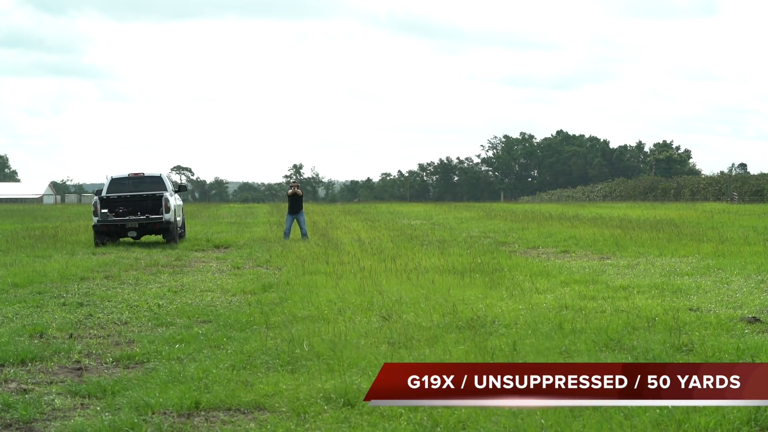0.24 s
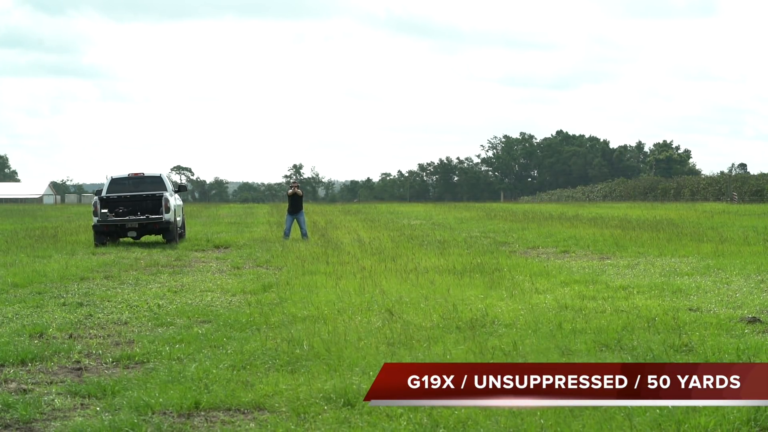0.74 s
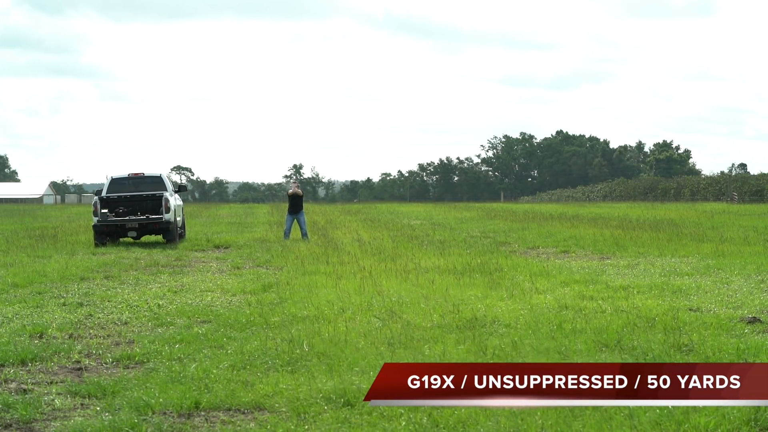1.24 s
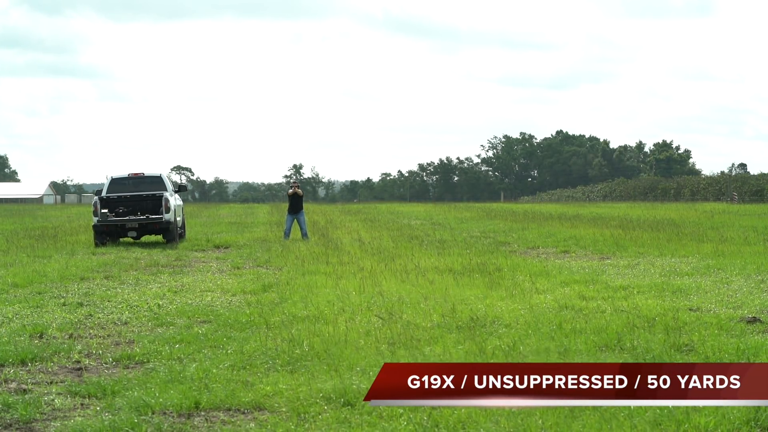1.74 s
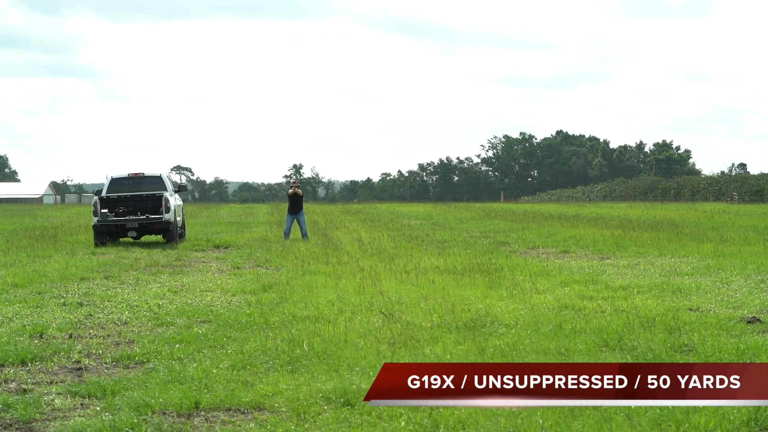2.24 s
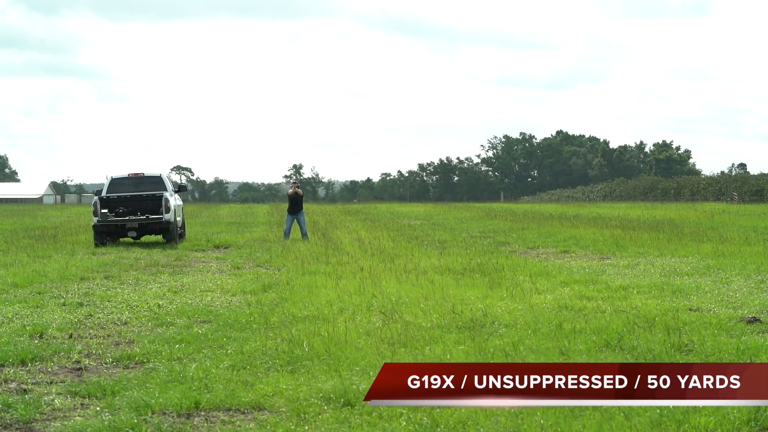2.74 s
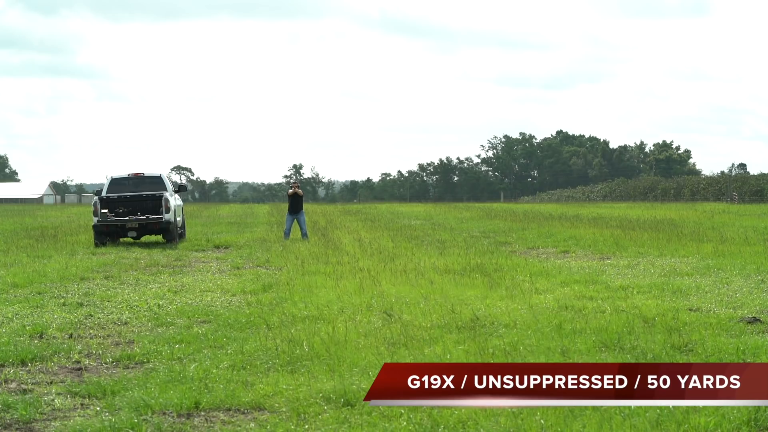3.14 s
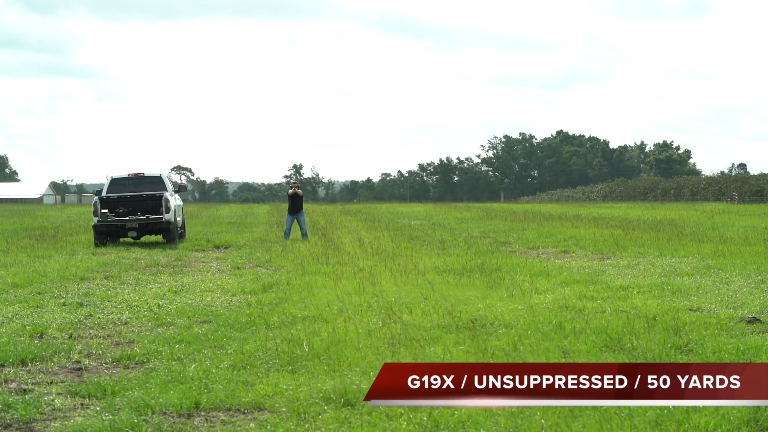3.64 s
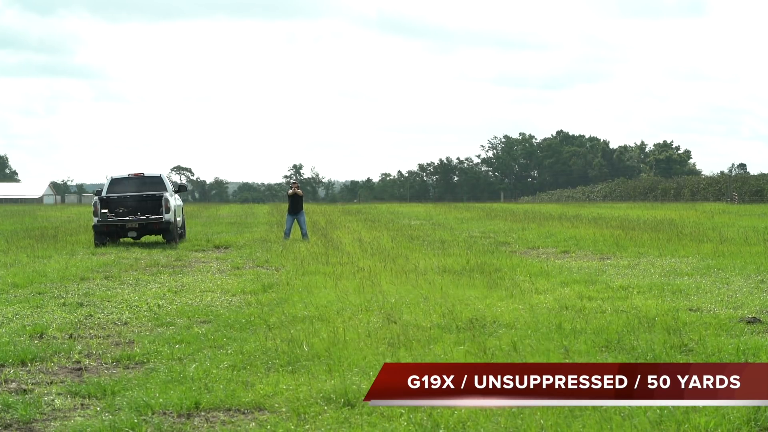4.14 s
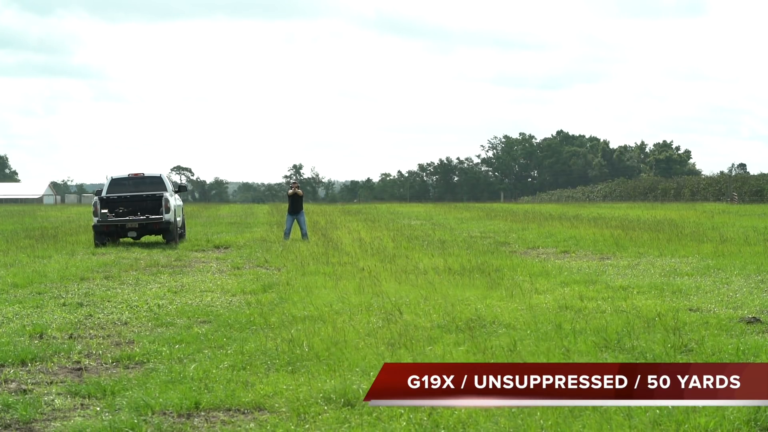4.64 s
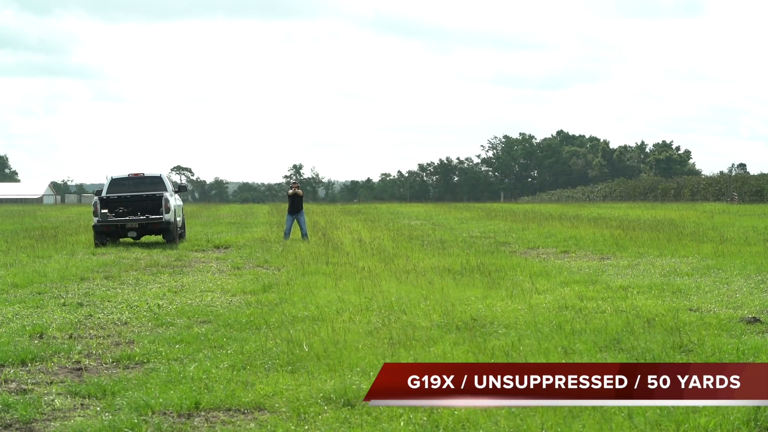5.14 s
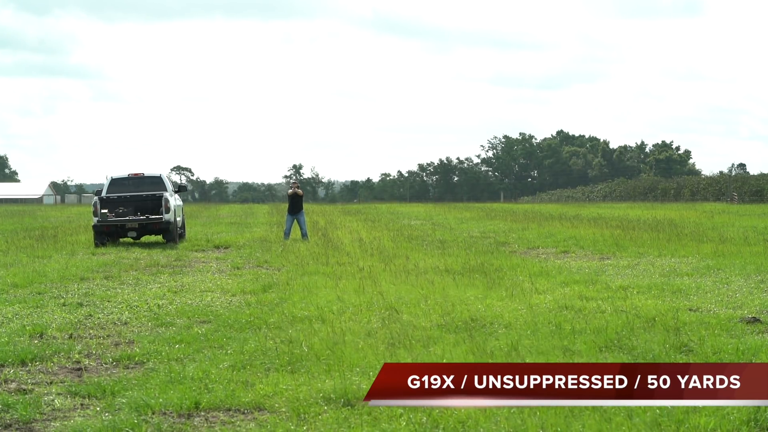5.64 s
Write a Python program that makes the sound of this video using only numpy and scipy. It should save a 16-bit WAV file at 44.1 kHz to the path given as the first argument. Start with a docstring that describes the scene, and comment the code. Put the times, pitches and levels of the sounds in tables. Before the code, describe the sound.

The sound opens on a quiet grass field with a faint wash of far traffic, light wind fluttering on the microphone and a thin, high hiss of insects with occasional short trills. Four pistol shots ring out from about fifty yards away, at roughly 1.4, 2.9, 4.3 and 5.7 seconds. Each is a very loud, sharp bullet crack fused with a barking bang that briefly overloads the stereo microphone; the last two are slightly stronger. A brief sizzle off the grass trails each one, and an eighth of a second later the bullet hits earth with a much quieter smack and thud. An echo returns from trees on the right after about a fifth of a second, then a fainter one from far left, rolling away. Between 2 and 3 seconds a distant vehicle's low rumble and tyre whine swell faintly.

```python
"""Four pistol shots ring out over an open grass field, about fifty yards from a stereo microphone.
Each bullet's crack and the muzzle blast overload the input. Grass and tree lines scatter the bang back,
and the bullet smacks into earth an eighth of a second after the shot.
Far traffic, light wind on the microphone and insects lie underneath."""
import sys
import numpy as np
from scipy import signal
from scipy.io import wavfile

SR = 44100
rng = np.random.default_rng(int(sys.argv[2]) if len(sys.argv) > 2 else 0)


def persist_wave(psi):
    """Save psi, clipped to +-1, as 16-bit WAV."""
    counts = np.round(np.clip(psi, -1, 1) * 32767).astype(np.int16)
    wavfile.write(sys.argv[1], SR, np.atleast_2d(counts).T)


N = 260190
TIME = np.arange(N) / SR

# The shots as they reach the microphone. Each row: start in seconds, crack gain in dB, crack length
# in ms, blast gain in dB, blast lag in ms, length of its push in ms, bark in Hz, thump gain in dB,
# bass cut in Hz, grass sizzle gain in dB, tree echo gain in dB.
SHOTS = [(1.4427, 3.5, .31, 10, .26, .2, 1080, 6, 114.9, 1, 0),
         (2.8763, 3, 0.32, 9, 0.2516, .16, 825, 12, 84.7, 0, 0.07),
         (4.346, 7, .27, 14, .23, .11, 890, 12, 76.6, -1.5, 0.44),
         (5.7004, 7, 0.24, 14, 0.21, 0.13, 884, 10.5, 62.3, 0.5, -2.5)]


def bang(crack_db, crack_ms, blast_db, lag_ms, push_ms, bark_hz, thump_db, low_cut_hz, front_ms=.026):
    """The bullet's N-shaped shock wave, then the muzzle blast: a sharp push and a longer suction."""
    ms = np.arange(-2, SR // 20) * 1000 / SR
    front = lambda t: np.clip(t / front_ms + .5, 0, 1)
    crack = (1 - 2 * ms / crack_ms) * front(ms) * front(crack_ms - ms)
    age = np.maximum(ms - lag_ms, 0) / push_ms
    blast = front(ms - lag_ms) * (1 - age) * np.exp(-age)
    # two resonances colour the blast on its way over the ground
    bark = from_db(8) * resonance(blast, bark_hz, width_hz=.68 * bark_hz)
    thump = from_db(thump_db) * resonance(blast, hz=220.55, width_hz=200)
    pressure = from_db(crack_db) * crack + from_db(blast_db) * (blast + bark + thump)
    return butter(pressure, low_cut_hz, "high")


def shots(scatter_db=-19, scatter_t60=.018, scatter_hz=1500, pan_db=1.0):
    """Each bang arrives directly, its treble scattered differently at each capsule, then rebounds."""
    # A parked truck and bumps in the ground close by. Each row: delay in seconds, gain in dB.
    reflections = [(0.0127, -33), (0.0169, -34.5), (.029, -33), (.036, -30.5)]
    out, t = np.zeros((2, N)), np.arange(SR // 100) / SR
    for start, *shape, _, _ in SHOTS:
        direct = bang(*shape)
        scatter = rng.standard_normal((2, len(t))) * from_db(-60 * t / scatter_t60)
        scatter = butter(scatter, scatter_hz, "high", order=1)
        scatter *= from_db(scatter_db) / np.linalg.norm(scatter, axis=1, keepdims=True)
        heard = direct + signal.fftconvolve(direct[None], scatter, axes=1)[:, :len(direct)]
        add(out, start - 2 / SR, heard * from_db([[pan_db], [-pan_db]]))
        for delay, db in reflections:
            cut_hz = 4000 * (reflections[0][0] / delay) ** 2.1   # later ones are duller
            add(out, start + delay, from_db(db) * butter(direct, cut_hz, "low", order=1))
    return out


def field_echoes():
    """Ground nearby, grass under the bullet's path, and trees whose answer varies with the wind."""
    # Tone of each echo. Each row: frequency in Hz, level in dB per Hz before the envelope shapes it.
    ground_colour = [(50, -89), (120, -73), (350, -62.5), (560, -67.5), (950, -66.5), (1500, -70.5),
                     (2100, -76), (2900, -73.5), (4500, -78), (8000, -83.5), (15000, -97)]
    grass_colour = [(1000, -105), (3000, -86), (5500, -86), (9000, -81), (15000, -79)]
    tree_colour = [(100, -104), (500, -95.5), (800, -83), (1150, -77), (2000, -88), (3200, -86),
                   (5200, -93), (7500, -93.5), (15000, -107)]
    # Stereo width of each echo. Each row: frequency in Hz, side minus mid in dB.
    ground_width = [(100, -19.5), (700, -11), (2500, -7), (6000, -3), (15000, -3)]
    grass_width = [(2000, -4), (15000, -4.5)]
    tree_width = [(500, -17.5), (3000, -16.5), (12000, -5.5)]
    ground = echoes([(start, 0) for start, *_ in SHOTS], ground_power, ground_colour, ground_width,
                    clump_db=3, clump_hz=500, steady_share=.78, size=SR)
    grass = echoes([(start, db) for start, *_, db, _ in SHOTS], grass_power, grass_colour, grass_width,
                   clump_db=.48, clump_hz=900, steady_share=.1, size=SR // 2)
    trees = echoes([(start, db) for start, *_, db in SHOTS], tree_power, tree_colour, tree_width,
                   clump_db=2.5, clump_hz=600, steady_share=.43, size=2 * SR)
    return ground + grass + trees


def echoes(bangs, power, colour, width, clump_db, clump_hz, steady_share, size):
    """The same reflectors answer every bang, in clumps; moving air changes part of the fine detail."""
    out, t = np.zeros((2, N)), np.arange(size) / SR
    envelope = np.sqrt(power(t) + 1e-18)
    clumps = rms_one(from_db(clump_db * np.clip(waver(clump_hz, size), -2, 2)))
    steady = rng.standard_normal((2, 2, size))
    for start, db in bangs:
        fresh = rng.standard_normal((2, 2, size))
        paths = clumps * (np.sqrt(steady_share) * steady + np.sqrt(1 - steady_share) * fresh)
        wash = np.zeros((2, size))
        for hz, noise in bands(paths, width):
            air_loss_db_per_s = 1.1 * (hz / 1000) ** 1.4   # air dulls the long paths
            wash += noise * from_db(at_hz(colour, hz) - air_loss_db_per_s * t)
        add(out, start, from_db(db) * envelope * wash)
    return out


def echo_power(t, delay, db, rise, hold, t60, pan_db):
    """Left and right power of one echo: it swells until its delay, holds, and dies away."""
    swell = np.exp(np.clip((t - delay) / rise, -50, 0))
    decay = from_db(db - 60 * np.clip((t - delay - hold) / t60, 0, 3))
    return (swell * decay * from_db([[pan_db / 2], [-pan_db / 2]])) ** 2


def ground_power(t):
    """The ground at the microphone answers at once; the wider field follows and dies away evenly."""
    return (echo_power(t, delay=.0033, db=2, rise=.001, hold=0, t60=.06, pan_db=2.5)
            + echo_power(t, delay=.012, db=-1.62, rise=.00099, hold=0, t60=.41, pan_db=1.5))


def grass_power(t, onset_s=.012, sweep_s=.052, growth_db_per_s=140):
    """The shock wave sweeps the grass: the sizzle grows along the bullet's path, then stops quickly."""
    growth = from_db(growth_db_per_s * np.clip(t - onset_s, 0, sweep_s))
    return growth ** 2 * echo_power(t, onset_s, db=-8, rise=.0036, hold=sweep_s, t60=.041, pan_db=-.1)


def tree_power(t, patchy_db=1.1):
    """Trees answer, more smeared with distance; sound lingers in the woods and rolls round the horizon."""
    # Belts of trees, a near one on the right and two far ones on the left. Each row: delay in seconds,
    # gain in dB, hold in seconds, time to fall 60 dB in seconds, left minus right in dB.
    tree_belts = [(.222, -0.24, 0.028, 0.37, -6.5), (0.675, -23, 0.03, 0.43, 14),
                  (0.774, -19, .1, 0.72, 11.5)]
    # Trunks and walls, one crack apiece. Each row: delay in seconds, gain in dB, left minus right in dB.
    hard_faces = [(.155, -8.5, -27.5), (.201, 2.5, -7.5), (0.761, -12, 14)]
    belts = sum(echo_power(t, delay, db, rise=.013 * delay, hold=hold, t60=t60, pan_db=pan_db)
                for delay, db, hold, t60, pan_db in tree_belts)
    faces = sum(echo_power(t, delay, db, rise=.0052 * delay, hold=0, t60=.12 * delay, pan_db=pan_db)
                for delay, db, pan_db in hard_faces)
    woods = echo_power(t, delay=.28, db=-5.5, rise=.007, hold=0, t60=1, pan_db=-3.5)
    horizon = echo_power(t, delay=1.3, db=-21.5, rise=.18, hold=0, t60=3, pan_db=8)
    patches = rms_one(from_db(patchy_db * waver(hz=45, size=len(t))))
    return faces + (belts + woods + horizon) * patches ** 2


def bullet_impacts(smack_t60=.0078, thud_t60=.02, spray_t60=.067, spray_hz=(900, 6000)):
    """A bullet hits earth: a hard smack with a bright snap, a low thud and a short spray of dirt."""
    # Hits downrange. Each row: start in seconds, smack gain in dB, smack pitch in Hz,
    # thud gain in dB, thud pitch in Hz, dirt spray level in dB.
    hits = [(1.5615, -20.5, 850, -18, 225, -53.5), (3.0009, -17, 530, -14.5, 182, -44),
            (4.4662, -14, 644, -23, 188, -47), (5.819, -17, 890, -23.5, 150, -52.5)]
    out, t = np.zeros((2, N)), np.arange(SR // 4) / SR
    for start, smack_db, smack_hz, thud_db, thud_hz, spray_db in hits:
        white, dirt, grain_size = rng.standard_normal((3, 2, len(t)))
        burst = white * from_db(-60 * t / smack_t60)
        burst[0, 0] += 3.2   # the first contact is a single sharp push
        snap = from_db(-8) * resonance(burst, hz=3500, width_hz=2200)
        smack = resonance(burst, smack_hz, width_hz=1100) - snap
        grains = butter(dirt * from_db(5 * grain_size), spray_hz, "band", order=1)
        spray = rms_one(grains) * from_db(spray_db - 60 * t / spray_t60)
        thud_envelope = (1 - np.exp(-t * thud_hz * 2)) * from_db(thud_db - 60 * t / thud_t60)
        thud = butter(np.sin(2 * np.pi * thud_hz * t) * thud_envelope, 85, "high")
        mid, side = from_db(smack_db) * smack + spray
        add(out, start, stereo(mid, side, side_db=-9) + thud)
    return out


def far_traffic():
    """A steady wash of distant roads, hollowed near 300 Hz by the soft ground."""
    # Tone at the microphone. Each row: frequency in Hz, level in dB per Hz.
    colour = [(30, -91.5), (85, -88.5), (140, -88), (210, -97), (320, -98.5), (440, -95), (570, -90.5),
              (900, -96), (1400, -109), (2100, -120), (3500, -126), (7000, -130), (15000, -132)]
    # Stereo width. Each row: frequency in Hz, side minus mid in dB.
    width = [(60, -5), (110, -4.5), (200, -6.5), (380, -4), (700, -10), (1290, -9), (2380, -6),
             (4400, -6.5), (8120, -1), (15000, -0.5)]
    white = rng.standard_normal((2, 2, N))
    return sum(from_db(at_hz(colour, hz)) * noise for hz, noise in bands(white, width))


def wind(buffet_hz=(22, 75), calm_db=-76, flutter_db=2.5):
    """Light wind buffets the microphone: a low flutter with a few short gusts."""
    # Gusts on the capsules. Each row: time of the peak in seconds, level in dB.
    gusts = [(.3, -62), (.7, -65.5), (2.32, -69.5), (3.47, -65), (5.04, -68)]
    mid, side = rms_one(butter(rng.standard_normal((2, N)), buffet_hz, "band"))
    calm = from_db(calm_db + flutter_db * waver(hz=5))
    gusting = sum(from_db(db) * bump(peak_s, half_length_s=.066) for peak_s, db in gusts)
    return stereo(mid, side, side_db=-3) * (calm + gusting)


def far_vehicle(rumble_db=-78.5, whine_db=-73.5, whine_width_hz=14, speed_up_at_s=4.7):
    """Low exhaust rumble and a wavering tyre whine swell together; the whine rises once with speed."""
    # Exhaust resonances. Each row: frequency in Hz, width in Hz, relative level in dB.
    exhaust_modes = [(139, 25, -1.5), (248, 33, -2)]
    # The vehicle swells and fades. Each row: centre in seconds, change of the rumble in dB.
    swells = [(.6, 4.5), (2.15, 16), (2.45, -4.5), (2.72, 10)]
    swell_db = sum(db * bump(centre, half_length_s=.22) for centre, db in swells)
    white = rng.standard_normal(N)
    rumble = rms_one(sum(from_db(db) * resonance(resonance(white, hz, width), hz, width)
                         for hz, width, db in exhaust_modes))
    speed_up = .5 + .5 * np.tanh((TIME - speed_up_at_s) / .25)
    whine_hz = 580 + 10 * speed_up + 13 * waver(hz=4)   # drifts with the road surface
    phase = 2 * np.pi * np.cumsum(whine_hz) / SR
    whine = rms_one(waver(whine_width_hz) * np.sin(phase) + waver(whine_width_hz) * np.cos(phase))
    return from_db(rumble_db + swell_db) * rumble + from_db(whine_db + .54 * swell_db) * whine


def insect_chorus(peak_s=2.3, rise_db_per_s=.76, fall_db_per_s=.5):
    """Insects far across the field blend into a high hiss that makes one slow swell."""
    # Bands of the chorus. Each row: centre in Hz, width in Hz, level at the peak in dB.
    chorus = [(4600, 1000, -83.5), (9200, 2200, -90.5)]
    swell_db = np.minimum(rise_db_per_s * (TIME - peak_s), fall_db_per_s * (peak_s - TIME))
    out = np.zeros((2, N))
    for hz, width, db in chorus:
        hiss = butter(rng.standard_normal((2, N)), [hz - width / 2, hz + width / 2], "band")
        out += from_db(db + swell_db) * rms_one(hiss)
    return out


def insect_trills(strokes_per_s=110, sweep_hz=1000, rise_hz_per_s=450, fade_db=9, peak_share=.68):
    """Insects nearer the microphone trill; every wing stroke is a short falling chirp."""
    # Each row: start in seconds, length in seconds, peak level in dB, pitch in Hz.
    trills = [(0, 0.45, -83.5, 7370), (1.797, 0.41, -92, 7800), (2.5, .35, -93, 7450),
              (3.15, .28, -90, 7750), (4.6, .3, -85.5, 7450)]
    out, unsteady = np.zeros(N), waver(hz=300)
    stroke = np.cumsum(strokes_per_s * (1 + .15 * unsteady)) / SR % 1
    for start, length, db, hz in trills:
        rise_hz = rise_hz_per_s * (TIME - start - length / 2)
        pitch = hz + sweep_hz * (.5 - stroke) + rise_hz + 130 * unsteady
        song = rms_one(np.sin(np.pi * stroke) * np.sin(2 * np.pi * np.cumsum(pitch) / SR))
        through = (TIME - start) / length
        swell_db = np.interp(through, [0, peak_share, 1], [-fade_db, 0, -fade_db / 2])
        out += song * from_db(db + swell_db) * ((through > 0) & (through < 1))
    return out


def from_db(db):
    """Decibels to gain."""
    return 10 ** (np.asarray(db) / 20)


def rms_one(x):
    """Scale to unit rms."""
    return x / np.sqrt(np.mean(x ** 2) + 1e-20)


def at_hz(points, hz):
    """Read a spectrum on a log-frequency axis."""
    frequencies, levels = np.array(points).T
    return np.interp(np.log(hz), np.log(frequencies), levels)


def butter(x, hz, kind, order=2):
    """Causal Butterworth filter."""
    sections = signal.butter(order, np.clip(hz, 10, .48 * SR), kind, fs=SR, output="sos")
    return signal.sosfilt(sections, x)


def resonance(x, hz, width_hz):
    """Two-pole resonance with gain 1 at its peak."""
    r = np.exp(-np.pi * width_hz / SR)
    feedback = [1, -2 * r * np.cos(2 * np.pi * hz / SR), r * r]
    return signal.lfilter(np.array([1, 0, -1]) * (1 - r * r) / 2, feedback, x)


def waver(hz, size=N):
    """Random drift below hz, at unit rms."""
    return rms_one(butter(rng.standard_normal(size), hz, "low"))


def bump(peak_s, half_length_s):
    """A smooth swell of height 1."""
    return np.exp(-((TIME - peak_s) / half_length_s) ** 2)


def add(out, start_s, sound):
    """Mix a sound in at its start time."""
    start = round(start_s * SR)
    out[:, start:start + sound.shape[-1]] += sound[..., :N - start]


def stereo(mid, side, side_db):
    """Left and right from a common part and a difference."""
    return mid + from_db(side_db) * side * np.array([[1], [-1]])


def bands(white, width):
    """Third-octave bands as (centre in Hz, stereo noise); neighbours draw on unrelated noise."""
    edges_hz = 22 * 2 ** np.arange(0, 9.8, 1 / 3)
    for k, (low, high) in enumerate(zip(edges_hz, edges_hz[1:])):
        hz = np.sqrt(low * high)
        mid, side = butter(white[k % 2], [low, high], "band") * np.sqrt(SR / 2)   # 0 dB per Hz
        yield hz, stereo(mid, side, at_hz(width, hz))


def scene():
    """Shots, their echoes and impacts over the quiet field."""
    gunfire = shots() + field_echoes() + bullet_impacts()
    return gunfire + far_traffic() + wind() + far_vehicle() + insect_chorus() + insect_trills()


def record(dry, clip_level=.93, cutoff_hz=16000):
    """The bangs overload the input; the highest treble is cut."""
    treble_cut = signal.ellip(8, .1, 60, cutoff_hz, fs=SR, output="sos")
    return signal.sosfilt(treble_cut, np.clip(dry, -clip_level, clip_level))


dry = scene()
out = record(dry)
persist_wave(out)
```